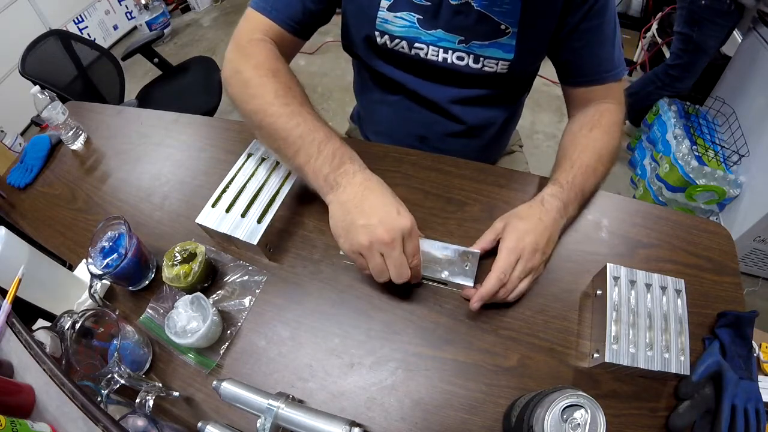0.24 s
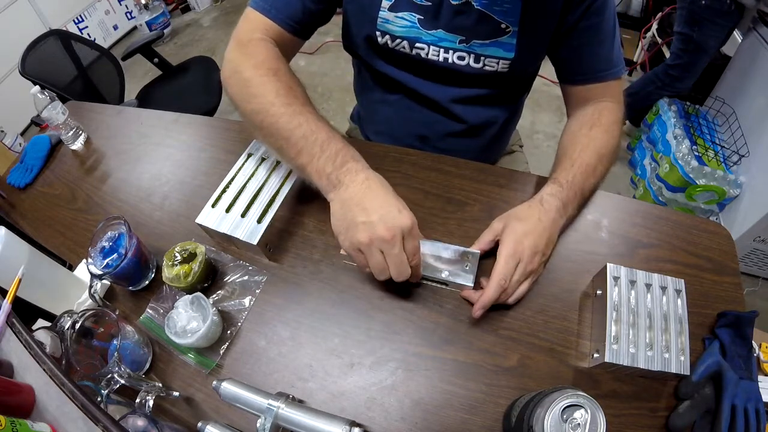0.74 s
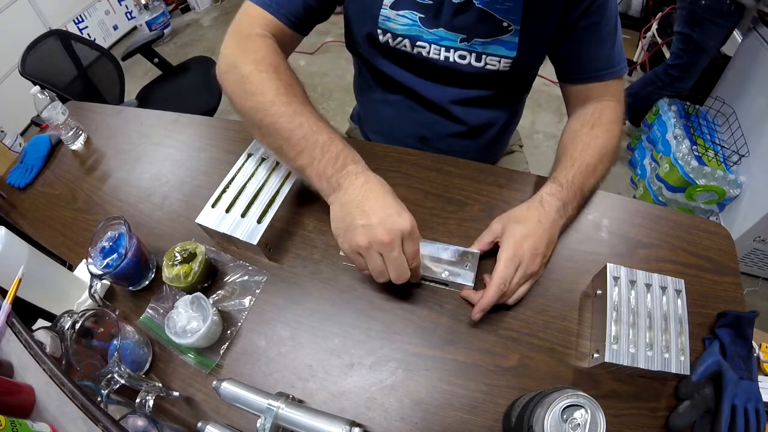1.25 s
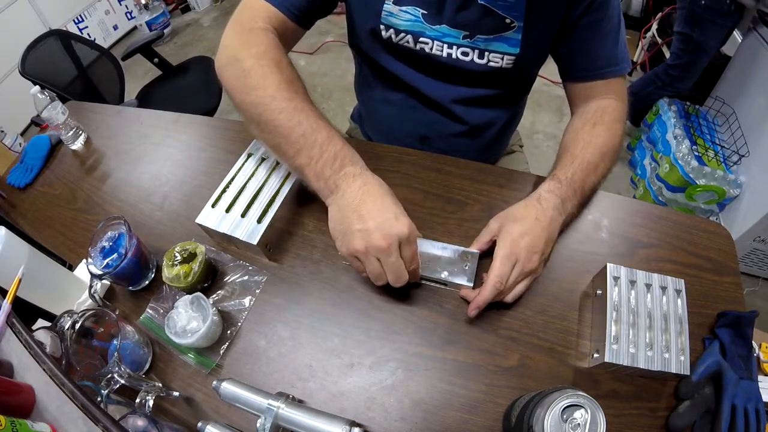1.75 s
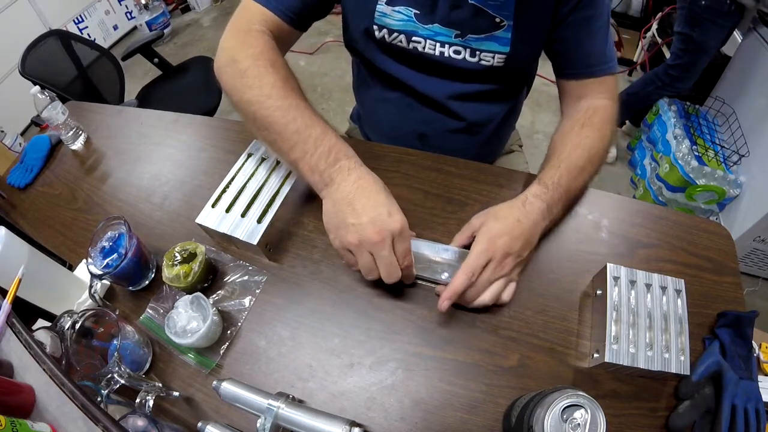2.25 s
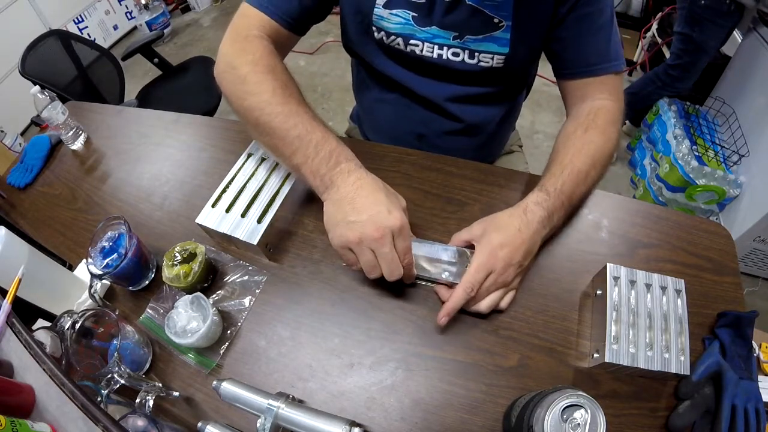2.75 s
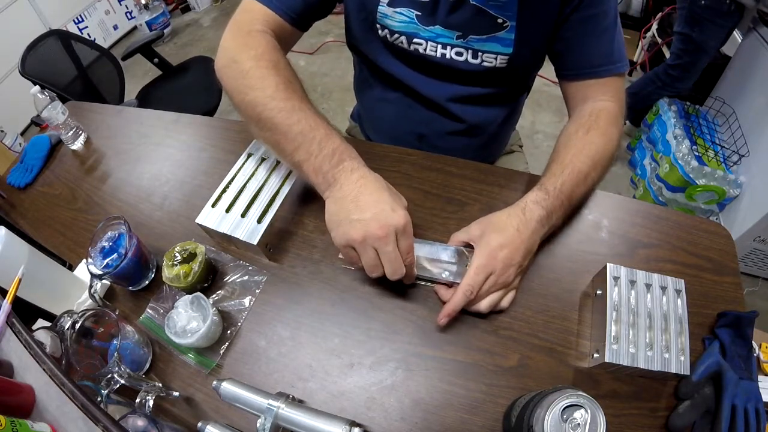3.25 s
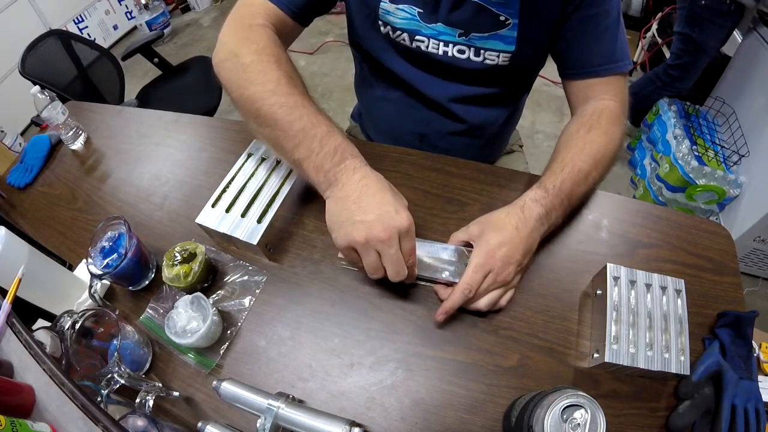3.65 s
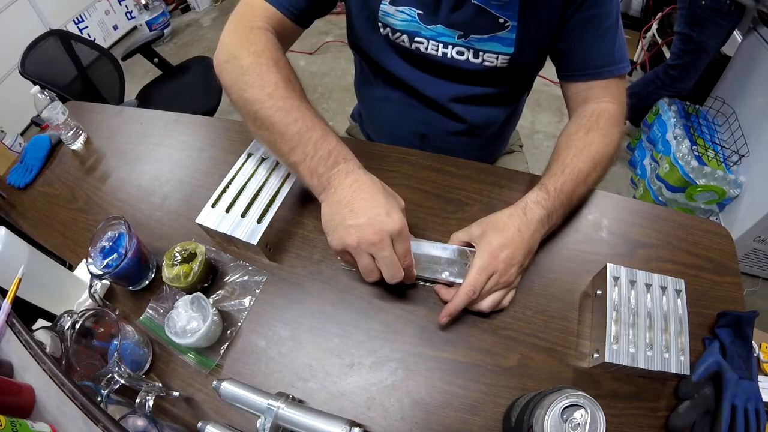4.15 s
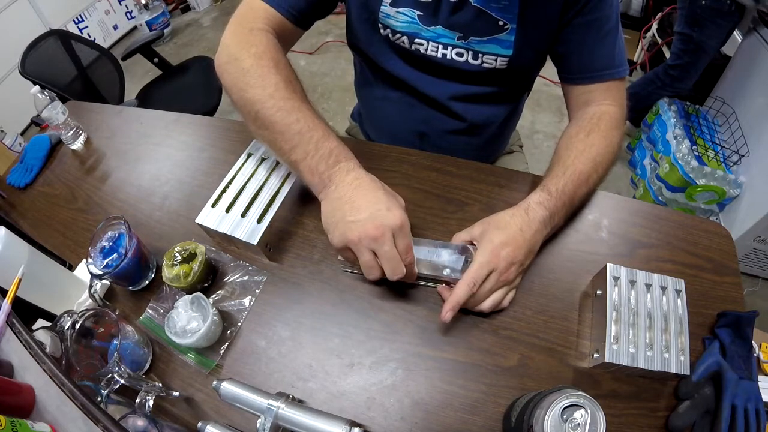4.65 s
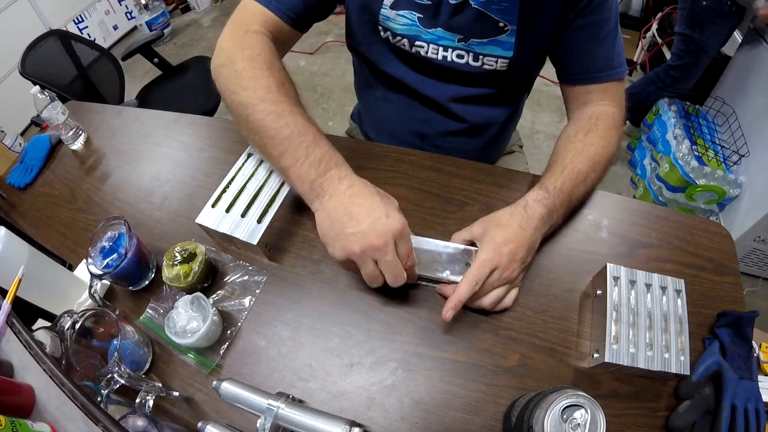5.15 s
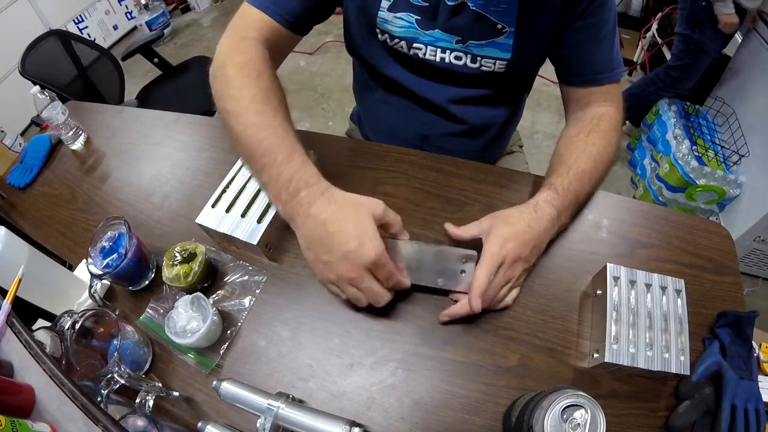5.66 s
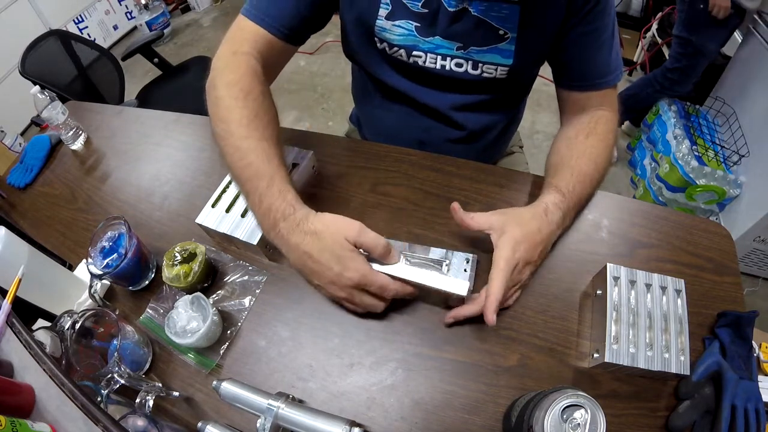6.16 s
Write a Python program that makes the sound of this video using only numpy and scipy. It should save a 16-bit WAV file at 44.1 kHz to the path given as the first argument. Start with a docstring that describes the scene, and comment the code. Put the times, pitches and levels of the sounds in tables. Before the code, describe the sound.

Hands rock and pry apart a small two-piece metal mold on a wooden desk, close to the microphone. Light taps and firm clacks come irregularly, and the desk answers with hollow knocks and soft thumps. From about halfway the halves also rub faintly against each other and give brighter, short clinks. One last hard knock ends the handling. Ventilation rumbles and hisses throughout, and the workroom adds a short echo.

```python
"""Two hands rock and pry apart a small two-piece aluminium mould on a wooden desk in a workroom.
Ventilation rumbles and hisses from the start. After two light taps, the halves clack firmly at 0.8 s
and the desk answers with a hollow note; each knock leaves a short echo. From 1.3 s on, a half is now
and then free enough to ring. From about 3 s the halves also slide against each other, with the loudest
clinks at 3.3, 4.4 and 5.2 s. One last hard knock at 5.7 s fades into the ventilation."""
import sys
import numpy as np
from scipy import signal
from scipy.fft import rfft, irfft
from scipy.io import wavfile

SR = 44100
rng = np.random.default_rng(int(sys.argv[2]) if len(sys.argv) > 2 else 0)


def master(y):
    """Save y as 16-bit WAV."""
    cut = np.clip(np.atleast_2d(y).T, -1, 1)
    pcm = np.round(cut * 32767)  # scale
    wavfile.write(sys.argv[1], SR, pcm.astype(np.int16))


N = 283122

# one row a knock: t/s, force/dB, flat landing/dB (more hollow note), edge bite/dB (more metal, less desk)
KNOCKS = [(0.124, -41, -14, -4), (0.2574, -33.5, 1.5, -2), (0.8107, -19.5, 2, 4.5), (0.8401, -19.5, 2, 1),
          (1.0013, -32.5, 3, 2), (1.017, -32, -7, 3.5), (1.2291, -35, 3.5, 2), (1.2908, -17.5, -3.5, 3.5),
          (1.441, -41.5, -5.5, 0), (1.5755, -34.5, -14, 16.5), (1.708, -49, -3.5, -1),
          (1.7664, -27.5, 1, -2.5), (1.805, -32.5, 0, -4), (1.924, -38.5, 1.5, 1), (1.939, -13.5, -2.5, 3),
          (1.968, -26, -17, 0.5), (2.325, -35.5, -13.5, -2.5), (2.599, -37.5, -6.5, 5),
          (2.772, -25.5, 1.5, 0), (2.783, -30.5, -2, 3), (2.946, -41.5, -5, -10), (3.225, -41, -5, -3),
          (3.261, -40, -2.5, 4), (3.2879, -18.5, 2, 2), (3.412, -38, -1, -10), (3.456, -32.5, -7, 2),
          (3.536, -43.5, -12, 0), (3.597, -39.5, -5.5, 2), (3.622, -36, -0.5, -1), (3.837, -43.5, -6.5, 2),
          (3.953, -30, -1, 1.5), (4.096, -42.5, -14, 3), (4.357, -17.5, -8, 0), (4.423, -29, -10, -10),
          (4.431, -30.5, -0.5, 12), (4.639, -29.5, 5.5, 1), (4.685, -35.5, -4, -2.5), (4.819, -42, -4, -7),
          (4.851, -40, -4, -11), (4.9843, -24, 1.5, 0), (5.054, -53, 4.5, 7), (5.167, -35.5, 8.5, 2),
          (5.2361, -15, -5, 7), (5.472, -50.5, -1.5, 0), (5.7442, -13.5, -5, 2.5)]
def knocks(to_room_db=(-2, -1, -5, -1, -1), blow_s=.025):
    """Each knock shakes desk and mould together. Returns the close sound and what goes into the room."""
    near, sent, t = np.zeros(N), np.zeros(N), np.arange(SR // 7) / SR
    for s, force_db, flat_db, bite_db in KNOCKS:
        clack = mould_clack(t, bite_db)
        top = desk_top(t)
        parts = [desk_frame(t), top, hollow_note(t), clack, edge_tick(t)]
        for db, send_db, part in zip(part_levels(force_db, flat_db, bite_db), to_room_db, parts):
            part = amp(db) * part * np.sqrt(blow_s * SR / np.sum(part ** 2))  # level counted over blow_s
            add(near, s, part)
            add(sent, s, amp(send_db) * part)
    return near, sent


def part_levels(force_db, flat_db, bite_db, firm_db=-20):
    """The five parts of a knock, in dB. With more force, the metal gets louder faster than the wood."""
    harder_db = force_db - firm_db
    frame = -32.5 + 0.66 * harder_db - 0.5 * bite_db
    top = -20 + 0.88 * harder_db - 0.5 * bite_db
    hollow = -19 + 0.55 * harder_db + flat_db
    clack = -19.5 + 1.094 * harder_db + 0.21 * bite_db
    tick = -37.5 + 0.9 * harder_db + 0.67 * bite_db
    return frame, top, hollow, clack, tick


# tones of the mould held on the desk: f/Hz, level/dB, fade/s (time to drop by 60 dB)
MOULD_TONES = [(947, -2.5, 0.037), (1065, 6.5, 0.027), (1223, -5, 0.046), (1373, -15.5, 0.045),
               (1465, -6, 0.054), (1545, -3, 0.054)]
def mould_clack(t, bite_db, high_above_hz=1373):
    """The halves clack, muffled by the hands. A striking edge brings out the highest tones."""
    lift_db = min(1.72 * bite_db, 12)
    tones = [(hz, db + lift_db * (hz > high_above_hz), fade) for hz, db, fade in MOULD_TONES]
    clack = chatter(reflect(ring(tones, t, scatter=0.75)))
    clack *= landing(t, first=0.24, settle_s=0.0058)
    clack *= drop(t, hold_s=0.012, fall_s=0.0042, left=0.095)
    return band(clack, 780, 1393)


# how strong the tick is from low to high: f/Hz, level/dB
TICK_SPECTRUM = [(900, -47), (1700, 5), (2300, -3.5), (2900, -3.5), (3400, -11), (4000, -11.5), (4700, -22),
                 (7000, -29.5), (10000, -41.5), (15000, -58)]
def edge_tick(t, grind_s=0.013, fade_s=0.0089):
    """Metal edges grind for a moment, making a tiny burst of noise."""
    fade = np.exp(-t / grind_s / 2 - np.maximum(t - grind_s, 0) / fade_s)
    return colour(rng.standard_normal(len(t)), TICK_SPECTRUM) * fade * landing(t, 0.58, settle_s=0.0015)


def chatter(x, rebound=0.82, within_s=.008):
    """The edge bounces three times right after it lands."""
    out = x.copy()
    for when, size in rng.random((3, 2)):
        add(out, when * within_s, rebound * size * x)
    return out


def landing(t, first, settle_s):
    """One corner touches first, then the whole face: the gain rises from `first` to 1."""
    return first + (1 - first) * np.minimum(t / settle_s, 1)


def drop(t, hold_s=0.02, fall_s=.005, left=.3):
    """The ring holds for a moment, then drops quickly: the gain falls from 1 to `left`."""
    return 1 - (1 - left) * np.clip((t - hold_s) / fall_s, 0, 1)


# tones of a loose half: f/Hz, level/dB, fade/s
LOOSE_TONES = [(1450, -5, 0.035), (1583, 18, 0.096), (1833, 16, 0.13), (2005, -1, 0.115), (2380, -23, 0.18),
               (2886, 8, 0.027), (3280, -23, .07), (3690, -9.5, 0.067), (3920, -15, 0.099),
               (4100, -31, 0.096), (5260, -12, 0.057), (5430, -17, 0.033), (6450, -31, .025),
               (6600, -20, 0.035), (7000, -19, 0.022), (8380, -46, 0.64)]
# each clink has a low and a high group of tones: t/s, low level/dB, low f/Hz, high level/dB, high f/Hz
CLINKS = [(1.297, -33, 2880, -39, 5300), (1.946, -25, 3170, -31, 5270), (2.9642, -36.5, 6600, -46, 7100),
          (3.292, -17, 1570, -45, 3700), (4.359, -15.5, 1546, -39, 3700), (4.432, -25, 1850, -28.5, 3650),
          (5.236, -13.5, 1580, -20.5, 1960), (5.238, -23, 3950, -46, 8460), (5.747, -26.5, 2870, -35, 5350),
          (5.75, -36, 4100, -55, 8400)]
def clinks(spread_octaves=0.07):
    """A loose half rings briefly. Where it is hit decides which tones stand out."""
    out, t = np.zeros(N), np.arange(SR // 3) / SR
    for s, low_db, low_hz, high_db, high_hz in CLINKS:
        for peak_db, centre_hz in (low_db, low_hz), (high_db, high_hz):
            tones = [(hz, db - 6 * (np.log2(hz / centre_hz) / spread_octaves) ** 2, fade)
                     for hz, db, fade in LOOSE_TONES]
            sound = ring(tones, t, detune=0.0016) * drop(t, hold_s=0.0068, fall_s=0.0066, left=0.18)
            add(out, s, amp(peak_db) * sound / abs(sound).max())
    return out


def hollow_note(t, hz=774.3, shift=.018, peak_s=0.011, fade_s=0.013):
    """The desk's hollow note builds up as the blow spreads through the wood, then dies away."""
    pitch_hz = hz * (1 + shift * rng.normal()) if shift else hz
    bloom = (t / peak_s * np.exp(1 - t / peak_s)) ** 4.8
    onset = 0.08 * amp(-60 * t / fade_s)
    return (bloom + onset) * np.sin(2 * np.pi * pitch_hz * t)


# tones of the desk's top: f/Hz, level/dB, fade/s
TOP_TONES = [(378, -8.5, 0.029), (412, -7, 0.032), (434, -1.5, 0.06), (490, 4.5, 0.04), (528, -3.5, 0.2),
             (589, -2, 0.069), (641, 3, 0.097), (697, 2.5, 0.097)]
def desk_top(t):
    """The wooden board rings briefly as the mould lands on it."""
    board = reflect(ring(TOP_TONES, t, detune=0.0084, scatter=1))
    board *= landing(t, first=1, settle_s=0.0093) * drop(t, hold_s=0.018, fall_s=0.018, left=0.26)
    return band(board, 227, 1310)


# tones of the desk's frame: f/Hz, level/dB, fade/s
FRAME_TONES = [(125.6, -1.5, 0.089), (167.3, 2, 0.041), (235, -2, 0.089)]
def desk_frame(t):
    """The frame answers a knock with a low thump."""
    return band(reflect(ring(FRAME_TONES, t, scatter=1)), 62, 490)


# soft pushes on the desk: t/s, peak level/dB
HAND_BUMPS = [(1.025, -33), (1.268, -30), (1.439, -31), (1.809, -23.5), (1.835, -26), (2.184, -27),
              (2.374, -43), (2.945, -33), (3.074, -34.5), (3.536, -28), (3.595, -26.5), (4.041, -35),
              (4.359, -19)]
def hand_bumps(rise_s=0.0055):
    """The heel of a hand is so soft that it moves only the desk's frame."""
    out, t = np.zeros(N), np.arange(SR // 4) / SR
    for s, db in HAND_BUMPS:
        push = ring(FRAME_TONES, t, detune=0.049, scatter=0.92) * (1 - np.exp(-t / rise_s))
        sound = band(push, 68, 226)
        add(out, s, amp(db) * sound / abs(sound).max())
    return out


# the halves slide against each other: middle t/s, half length/s, level/dB
SLIDES = [(3.002, .03, -43), (3.547, 0.33, -44.5), (4.083, .09, -51), (4.798, 0.77, -47.5)]
def rubbing(slips_per_s=160, grip_db=-65.5):
    """Tiny slips ring desk and mould: faintly under the fingers all along, louder in each slide."""
    t = np.arange(SR // 12) / SR
    slips = rng.standard_normal(N) * (rng.random(N) < slips_per_s / SR)
    one_slip = ring(TOP_TONES + MOULD_TONES, t, scatter=1) * drop(t) + hollow_note(t, shift=0)
    sound = band(signal.oaconvolve(slips, one_slip)[:N], 246, 1200)
    strokes = sum(amp(db) * swell(s, half_s) for s, half_s, db in SLIDES)
    return unit(sound) * (amp(grip_db) + strokes)


# first echoes off desk, body and ceiling: delay/s, gain
FIRST_ECHOES = [(.0024, 0.3), (.0057, -0.023), (0.0125, 0.31), (0.0178, 0.21)]
def reflect(x):
    """Nearby surfaces send back weaker copies of a sound."""
    out = x.copy()
    for delay, gain in FIRST_ECHOES:
        add(out, delay, gain * x)
    return out


def room(x, count=3, turns_per_s=2.3):
    """The room's echo: three noise tails blend in turn, keeping it smooth and free of stray tones."""
    turn = np.arange(N) / SR * turns_per_s
    offsets = [(turn - k + count / 2) % count - count / 2 for k in range(count)]
    shares = [np.cos(np.pi / 2 * np.clip(offset, -1, 1)) for offset in offsets]
    return sum(signal.oaconvolve(x * share, echo_tail())[:N] for share in shares)


# how long the room rings: f/Hz, fade/s
ROOM_FADES = [(150, 0.55), (400, 0.32), (1040, 0.36), (2760, 0.43), (8000, 0.11)]
# how strong its echo is from low to high: f/Hz, level/dB
ROOM_SPECTRUM = [(100, 4), (400, 2.5), (780, -4.5), (1100, -1.5), (1600, -11.5), (3000, -2.5), (9000, -10)]
def echo_tail(first_s=0.0072, build_s=0.0032):
    """Countless echoes blur into noise, in which each pitch dies at its own speed."""
    hz, t, spectrum = signal.stft(rng.standard_normal(SR * 3 // 4), SR, nperseg=256)
    fade = amp(-60 * t / read(ROOM_FADES, hz)[:, None])
    noise = signal.istft(spectrum * fade, SR, nperseg=256)[1]
    onset = np.clip((np.arange(len(noise)) / SR - first_s) / build_s, 0, 1)
    return colour(noise, ROOM_SPECTRUM) * onset / np.linalg.norm(noise * onset)


# low, middle and high noise of moving air: f/Hz, level/dB
RUMBLE = [(10, -13.5), (25, 3), (42, -3), (65, -8), (90, -8), (125, -11), (190, -18), (300, -28.5),
          (600, -50), (2000, -78)]
DRAUGHT = [(100, 1), (300, 1.5), (600, -0.5), (820, 1), (1100, -6), (1430, 1), (1750, -12.5), (2300, -36),
           (5000, -80)]
HISS = [(1200, -9), (1900, 1.5), (2500, 0), (3500, -1), (4400, -4), (5000, -7.5), (7000, -10.5),
        (9400, -12.5), (11500, -8), (13400, -8.5), (14000, -14), (15000, -21)]
# narrow peaks in the hiss: f/Hz, width/Hz, boost/dB
FAN_PEAKS = [(4250, 98, 8), (5790, 240, 10), (6910, 190, 7.5), (8660, 330, 4.5)]
def ventilation(rumble_db=-39, waver_db=1, draught_db=-43.5, hiss_db=-52.5):
    """Moving air makes a wavering rumble, an even draught and a steady hiss."""
    hz = np.fft.rfftfreq(N, 1 / SR)
    rumble = unit(colour(rng.standard_normal(N), RUMBLE)) * amp(rumble_db + waver_db * drift(4.6))
    draught = unit(colour(rng.standard_normal(N), DRAUGHT)) * amp(draught_db)
    peaks_db = sum(db / (1 + (2 * (hz - f) / width) ** 2) for f, width, db in FAN_PEAKS)
    hiss = unit(irfft(rfft(rng.standard_normal(N)) * amp(read(HISS, hz) + peaks_db), N))
    return rumble + draught + hiss * amp(hiss_db)


# the narrow band of the fan's whine: f/Hz, level/dB
WHINE_SPECTRUM = [(2500, -31), (2820, -2.5), (2985, 9.5), (3130, -10.5), (3400, -45)]
def fan_whine(level_db=-56.5, swell_db=2):
    """The fan adds a fuzzy whine that swells once."""
    noise = unit(colour(rng.standard_normal(N), WHINE_SPECTRUM))
    return noise * amp(level_db + swell_db * swell(middle_s=4.05, half_s=0.22))


def ring(tones, t, detune=0.0017, spread_db=1, scatter=0):
    """A struck thing rings in fading tones; grip and point of contact shift each a little every time."""
    return sum(amp(db + spread_db * rng.normal() - 60 * t / fade_s)
               * np.sin(2 * np.pi * hz * (1 + detune * rng.normal()) * t + scatter * rng.normal())
               for hz, db, fade_s in tones)


def swell(middle_s, half_s):
    """A smooth rise and fall of height 1."""
    return np.exp(-((np.arange(N) / SR - middle_s) / half_s) ** 2)


def drift(rate_hz):
    """A slow random wander, no faster than rate_hz."""
    return unit(irfft(rfft(rng.standard_normal(N)) * (np.fft.rfftfreq(N, 1 / SR) < rate_hz), N))


def band(x, lo_hz, hi_hz):
    """Keeps the range of pitches that a part gives off."""
    return signal.sosfilt(signal.butter(3, [lo_hz, hi_hz], "band", fs=SR, output="sos"), x)


def colour(x, points):
    """Turns each frequency up or down by a table's dB."""
    return irfft(rfft(x) * amp(read(points, np.fft.rfftfreq(len(x), 1 / SR))), len(x))


def read(points, hz):
    """Reads between a table's rows, on a scale of pitch."""
    f, value = np.transpose(points)
    return np.interp(np.log(hz + 1), np.log(f + 1), value)


def amp(db):
    """Decibels to gain."""
    return 10 ** (np.asarray(db) / 20)


def unit(x):
    """Scales to an average strength (rms) of 1."""
    return x / np.sqrt(np.mean(x ** 2) + 1e-20)


def add(mix, s, sound):
    """Mixes a sound in at time s."""
    part = mix[max(round(s * SR), 0):][:len(sound)]
    part += sound[:len(part)]


def scene(room_db=-7):
    """Mould and desk close by, the room around them."""
    near, sent = knocks()
    metal = clinks()
    echo = amp(room_db) * room(sent + metal)
    return (near + metal + hand_bumps() + rubbing() + echo + ventilation() + fan_whine())[None]


def record(dry, knee=0.57, top_hz=15100):
    """Rounds off peaks above the knee, then cuts the highest treble."""
    over = np.maximum(abs(dry) - knee, 0)
    rounded = np.sign(dry) * (abs(dry) - over + (1 - knee) * np.tanh(over / (1 - knee)))
    treble_cut = signal.firwin(511, top_hz, window=("kaiser", 9), fs=SR)
    return signal.oaconvolve(rounded, treble_cut[None], "same")


dry = scene()
out = record(dry)
master(out)
```